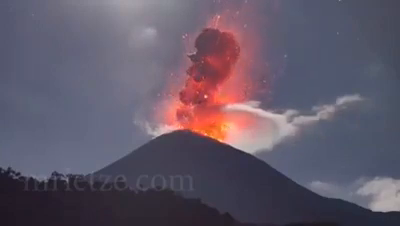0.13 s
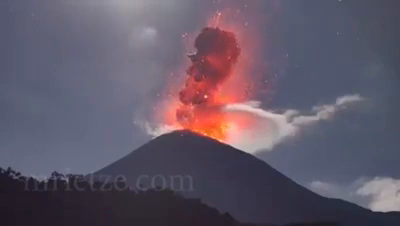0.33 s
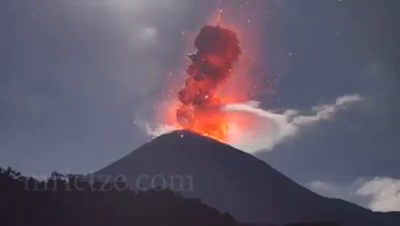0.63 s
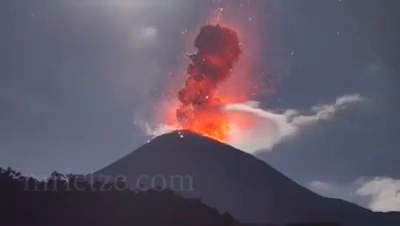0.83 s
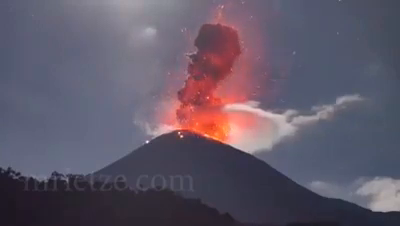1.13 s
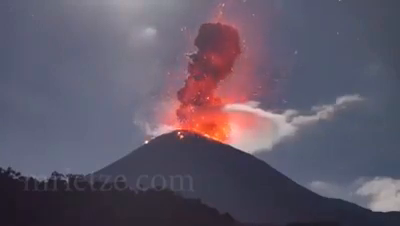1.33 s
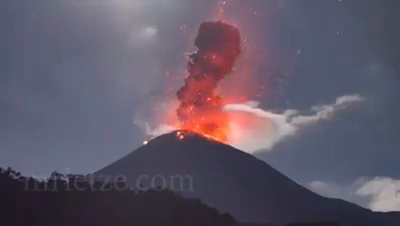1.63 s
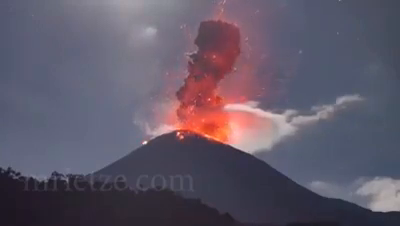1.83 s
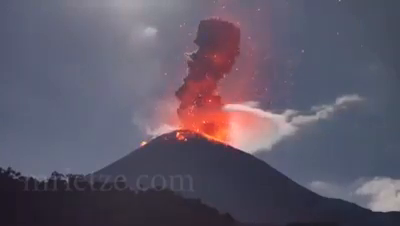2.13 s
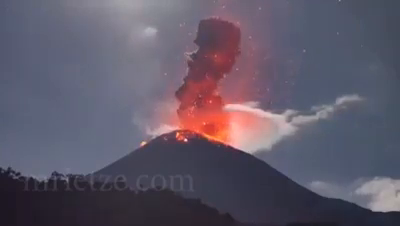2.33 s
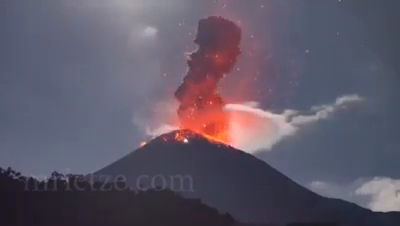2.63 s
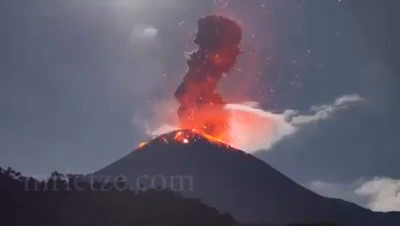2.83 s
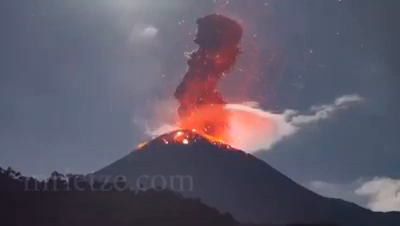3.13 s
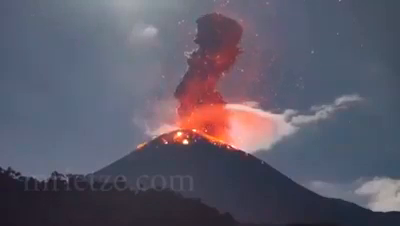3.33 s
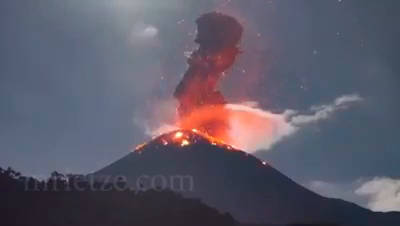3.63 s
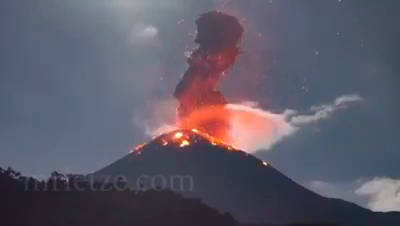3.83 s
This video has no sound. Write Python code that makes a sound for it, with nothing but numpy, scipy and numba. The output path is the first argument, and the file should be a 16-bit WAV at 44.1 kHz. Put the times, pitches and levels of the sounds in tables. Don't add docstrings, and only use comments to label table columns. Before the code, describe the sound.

Distant volcanic eruption outdoors: soft wind and dry grass hiss, a sudden deep ground rumble, fluttering gas bursts, one hard crack, then a sustained throbbing roar easing late; the microphone level ducks under the blast.

```python
import sys
import numpy as np
from scipy import signal
from scipy.fft import rfft, irfft, next_fast_len
from scipy.io import wavfile
from scipy.ndimage import uniform_filter1d, minimum_filter1d, map_coordinates
from numba import njit

SR = 44100
rng = np.random.default_rng(int(sys.argv[2]) if len(sys.argv) > 2 else 0)


def master(y):
    cut = np.clip(np.atleast_2d(y).T, -1, 1)
    pcm = np.round(cut * 32767)
    wavfile.write(sys.argv[1], SR, pcm.astype(np.int16))


def rack_gain(trim_db):
    fader = np.asarray(trim_db, float)
    return 10 ** (fader / 20)


N = 176400

ARRIVE_S = 0.825


def unit(x):
    return x / np.sqrt(np.mean(x ** 2) + 1e-20)


def clock():
    return np.arange(N) / SR


def white():
    return rng.standard_normal(N)


def curves(rows):
    s, *cols = np.transpose(rows)
    return [np.interp(clock(), s, c) for c in cols]


def wobble(rate):
    knots = rng.standard_normal(int(N * rate / SR) + 4)
    return map_coordinates(knots, [clock() * rate])


def coloured(x, points):
    m = next_fast_len(N + 8192)
    f, db = np.transpose(points)
    log_hz = np.log(np.fft.rfftfreq(m, 1 / SR) + 1)
    gain = rack_gain(np.interp(log_hz, np.log(f + 1), db, -120, -120))
    return unit(irfft(rfft(x, m) * gain, m)[:N])


def patchy(depth_db):
    z = signal.stft(rng.standard_normal(N + 512), nperseg=512)[2]
    field = uniform_filter1d(rng.standard_normal(z.shape), 5, 0)
    field = uniform_filter1d(field, 10, 1)
    return signal.istft(z * rack_gain(depth_db * unit(field)), nperseg=512)[1][:N]


def whine():
    # (pitch [Hz], level [dB])
    tones = [(9938, -87), (10688, -87), (11438, -82), (12937, -85)]
    return sum(np.sqrt(2) * rack_gain(db) * np.sin(2 * np.pi * hz * clock()) for hz, db in tones)


def breeze():
    # (time [s], level [dB])
    wind_levels = [(0, -0.5), (.82, 0.5), (.86, -3.5), (.99, 2), (1.045, 3), (1.09, -7.5), (1.3, 0), (1.6, -2.5),
                   (2.1, 0), (2.58, -2), (2.66, 3), (3.3, 3), (4, 2)]
    # (frequency [Hz], density [dB per Hz])
    wind_tone = [(15, 5), (100, -10), (300, 0.5), (700, 1), (2000, -10), (6500, -24.5), (11800, -43),
                 (14800, -49)]
    # (frequency [Hz], density [dB per Hz])
    treble_tone = [(6500, -11.5), (8500, -2), (10500, -8), (12300, -15.5), (13000, -30.5)]
    breeze_db, treble_db, treble_end_s = -28.5, -27.5, 1.1
    side_db, side_tilt_db = -43, 21

    wind_gain = rack_gain(curves(wind_levels)[0] + 0.27 * wobble(6.7) + 0.46 * wobble(11))
    wind = wind_gain * coloured(patchy(depth_db=1.35), wind_tone)
    side_tone = [(hz, db + side_tilt_db * np.log2(hz / 4000)) for hz, db in wind_tone]
    side = rack_gain(side_db) * coloured(white(), side_tone)
    fade = np.clip((treble_end_s - clock()) / .03, 0, 1)
    treble = rack_gain(treble_db) * fade * coloured(patchy(depth_db=4.0), treble_tone)
    mid = wind + treble
    return rack_gain(breeze_db) * np.array([mid + side, mid - side])


def ground():
    # (time [s], pitch [Hz], level [dB])
    swing = [
        (.715, 30.13, -49),
        (.79, 30.2, -21),
        (.835, 36, -11),
        (.93, 34.6, -7.5),
        (1.08, 29.7, -15.5),
        (1.46, 26.26, -19.5),
        (1.62, 29.3, -8),
        (1.79, 29.7, -8),
        (1.9, 30.1, -16),
    ]
    # (frequency [Hz], density [dB per Hz])
    shake_tone = [(10, -22), (20, 8), (32, -22.5), (55, -1), (75, -17), (100, -53)]
    shake_db, shake_fade_db_per_s, lump_db = -9.5, 3.5, 2.5

    t = clock()
    hz, db = curves(swing)
    started = t > swing[0][0]
    lumps = lump_db * np.clip((t - 1) / 0.11, 0, 1) * wobble(14)
    ending = np.clip((swing[-1][0] - t) / 0.047, 0, 1)
    tone = np.sin(2 * np.pi * np.cumsum(hz) / SR + 0.11)
    wave = np.sqrt(2) * rack_gain(db + lumps) * tone * started * ending

    front = started / (1 + np.exp(-(t - ARRIVE_S - .2) / .06))
    fading = rack_gain(shake_db - shake_fade_db_per_s * (t - ARRIVE_S))
    return wave + fading * front * coloured(white(), shake_tone)


def wide_puffs():
    # (time [s], half length [s], pitch [Hz], level [dB])
    puffs = [
        (.07, 0.045, 280, -70),
        (.07, 0.054, 800, -70),
        (.46, 0.033, 400, -67),
        (2.214, 0.041, 330, -34),
        (3.255, 0.036, 240, -37),
        (3.243, 0.022, 1200, -54),
        (3.978, 0.017, 250, -35),
    ]
    side = np.zeros(N)
    for s, half, hz, db in puffs:
        swell = np.exp(-.5 * ((clock() - s) / half) ** 2)
        side += rack_gain(db) * swell * coloured(white(), [(hz / 2, -25), (hz, 0), (hz * 1.7, -40)])
    return np.array([side, -side])


def bursts():
    # (time [s], half length [s], level [dB])
    blows = [(.992, .012, -26), (1.033, .01, -28), (1.052, .007, -23), (1.071, .005, -15),
             (1.097, .006, -17), (1.229, .006, -20), (1.26, .012, -25), (1.292, .006, -16),
             (1.306, .007, -19), (1.34, .008, -17), (1.364, .006, -18), (1.42, .025, -19),
             (1.472, .018, -15), (1.53, .007, -15), (1.579, .009, -11), (1.602, .008, -16),
             (1.686, .018, -13), (1.732, .008, -16), (1.83, .015, -17), (1.88, .01, -14), (1.98, .01, -15),
             (2.268, .006, -10), (3.191, .006, -12)]
    # (frequency [Hz], density [dB per Hz])
    burst_tone = [(130, -29), (280, -0.5), (600, -3), (1000, -10), (1500, -19.5), (2300, -29), (4000, -65)]
    shape, t = np.zeros(N), np.arange(-SR // 10, SR // 10) / SR
    for s, half, db in blows:
        width = half * np.where(t < 0, .45, .75)
        start = round(s * SR) - SR // 10
        shape[start:][:len(t)] += rack_gain(db) * np.exp(-.5 * (t / width) ** 2)
    return shape * coloured(white(), burst_tone)


def shocks():
    # (time [s], peak level [dB])
    fronts = [(1.053, -45), (1.069, -35), (1.079, -47), (1.167, -52), (1.18, -52), (1.200, -51),
              (1.229, -37), (1.311, -49), (1.337, -31), (1.488, -44), (1.532, -46), (1.565, -49),
              (1.600, -46), (1.652, -49), (1.688, -44), (1.701, -48), (1.731, -45), (1.768, -48),
              (1.828, -48), (1.889, -46), (1.959, -46), (2.014, -46), (2.081, -37), (2.177, -43),
              (2.519, -49), (2.713, -47), (2.892, -42), (3.78, -50)]
    # (frequency [Hz], density [dB per Hz])
    snap_tone = [(800, -12), (2000, -5), (6000, -9.5), (10000, -21.5), (15000, -37)]
    # (frequency [Hz], density [dB per Hz])
    scatter_tone = [(700, -27.5), (1500, -8.5), (3000, -5), (6000, -13), (8000, -18.5), (10000, -35),
                    (12000, -55)]
    shock_db, shock_s, front_hz = 24, .0012, 4500
    fray_db, fray_s, fray_hz = -21, 0.026, 4200
    crack_s, snap_db, snap_s = 1.338, -29, .045
    scatter_db, scatter_rise_s, scatter_db_per_s, flutter_db = -37, 0.003, 38, .8
    near_slope_s, far_slope_db = 0.153, -3.5

    t, kicks = clock(), np.zeros(N)
    for s, db in fronts:
        kicks[round(s * SR)] = rack_gain(db + shock_db)
    u = t[:SR // 20] / shock_s
    jump = (1 - u) * np.exp(-u)
    fray = rack_gain(fray_db - 60 * u * shock_s / fray_s) * rng.standard_normal(len(u))
    pulse = signal.lfilter(*signal.butter(3, front_hz, fs=SR), jump)
    pulse = pulse + signal.lfilter(*signal.butter(2, fray_hz, fs=SR), fray)

    after = t - crack_s
    snap = (after > 0) * rack_gain(snap_db - 60 * np.abs(after) / snap_s) * coloured(white(), snap_tone)
    decay_db = -scatter_db_per_s * np.abs(after) + far_slope_db * (after > near_slope_s)
    shape = np.clip(after / scatter_rise_s, 0, 1) * rack_gain(decay_db)
    hiss = coloured(patchy(depth_db=-1.0), scatter_tone)
    scatter = rack_gain(scatter_db + flutter_db * wobble(40)) * shape * hiss
    return signal.fftconvolve(kicks, pulse)[:N] + scatter + snap


def jet():
    # (time [s], roar level [dB], throb over its mean [dB])
    strength = [(.9, -35, 2), (.98, -28, 2), (1.06, -19, 3), (1.17, -19, 1), (1.305, -12.5, 5),
                (1.322, -28.5, 5.5), (1.345, -21, 1), (1.4, -17.5, -2.5), (1.5, -15.5, 5.5), (1.64, -13, 0),
                (1.85, -9, 4.5), (2.25, -7, 1), (2.6, -8.5, 3), (2.9, -6.5, 2.5), (3.2, -11, -0.5),
                (3.5, -15.5, -2), (3.8, -17.5, -2), (4.0, -18.5, -4)]
    # (frequency [Hz], density [dB per Hz])
    roar_tone = [(88, -34), (150, -6), (266, 1.5), (307, -3), (342, -1.5), (501, -7), (837, -10.5),
                 (1410, -22.5), (2600, -51), (3380, -85), (5720, -120)]
    # (frequency [Hz], density [dB per Hz])
    throb_tone = [(55, -40.5), (75, -4.5), (110, 2), (150, -1.5), (200, -16.5), (330, -44), (450, -77.5)]
    puffs_per_s, puff_spread_db, puff_share, rarest = 3000, 3.5, 0.34, .01
    chop_db, steady_s = 1.8, 2.0
    throb_mean_db, rise_s = -15, 0.043

    t = clock()
    roar_db, throb_db = curves(strength)
    chance, size = rng.random((2, N))
    puff_gain = rack_gain(-puff_spread_db * np.log(size + rarest))
    puffs = (chance < puffs_per_s / SR) * puff_gain * np.sign(white())
    gas = np.sqrt(puff_share) * unit(puffs) + np.sqrt(1 - puff_share) * unit(patchy(depth_db=-0.5))
    surge_db = chop_db * np.clip(steady_s - t, 0, 1) * wobble(45)
    surge_db = surge_db + 1.1 * wobble(30.09) + 0.17 * wobble(8)
    opening = np.clip((t - strength[0][0] + 0.023) / 0.15, 0, 1)
    roar = rack_gain(roar_db + surge_db) * coloured(gas, roar_tone) * opening

    front = 1 / (1 + np.exp(-(t - ARRIVE_S) / rise_s)) ** 2
    throb_gain = rack_gain(throb_mean_db + throb_db + 0.72 * wobble(9.1))
    return roar + throb_gain * front * coloured(white(), throb_tone)


def scene():
    air = breeze()
    eruption = ground() + wide_puffs() + bursts() + shocks() + jet()
    return air + rack_gain(12) * eruption


@njit
def recover(need, step):
    out = np.empty_like(need)
    g = 1.0
    for i in range(len(need)):
        g = min(need[i], g + step * (1 - g))
        out[i] = g
    return out


def gain_control(x):
    aim_db, sense_s, release_s = -10, 0.067, 3.1
    sense = int(sense_s * SR)
    power = uniform_filter1d(x.mean(0) ** 2, sense, origin=(sense - 1) // 2)
    loudness = np.sqrt(np.abs(power) + 1e-12)
    need = np.minimum(1, rack_gain(aim_db + 4) / loudness)
    gain = recover(need, 1 / (release_s * SR * 4))
    return x * uniform_filter1d(gain, sense // 2 + 1)


def limiter(x):
    ceiling, look_s, hard = .96, .004, 14
    look = int(look_s * SR)
    need = np.minimum(1, ceiling / (np.abs(x).max(0) + 1e-9))
    need = minimum_filter1d(need, 2 * look + 1)
    x = x * uniform_filter1d(need, look)
    return x / (1 + np.abs(x) ** hard) ** (1 / hard)


def thinned(x):
    # (frequency [Hz], level [dB per bin])
    threshold = [(2000, -112), (2800, -86), (5000, -91), (7600, -97), (8100, -87), (8500, -91.5),
                 (9400, -93), (10000, -92), (12000, -96), (13000, -94), (15000, -96)]
    fickle_db, fickle_top_hz = 4, 7500

    hz, t, z = signal.stft(np.pad(x, ((0, 0), (0, 4096)), "reflect"), SR, nperseg=2048)
    f, db = np.transpose(threshold)
    least = rack_gain(np.interp(hz, f, db, -200))[:, None] ** 2
    power = np.abs(z.mean(0)) ** 2
    drift = unit(uniform_filter1d(rng.standard_normal((128, len(t))), size=7, axis=1))
    fickle = rack_gain(fickle_db * (hz[:1024:8, None] < fickle_top_hz) * drift)
    band = power[:1024].reshape(128, 8, -1).mean(1) * fickle ** 2
    band = np.repeat(band, 8, axis=0)
    low = (np.vstack([band, band[-1:]]) > least) & (power > .6 * least)
    smooth = uniform_filter1d(uniform_filter1d(power, size=20, axis=0), size=3, axis=1)
    keep = np.where(hz[:, None] < fickle_top_hz, low, smooth > least)
    return signal.istft(z * keep, SR, nperseg=2048)[1][:, :N]


def band_limit(x):
    return signal.sosfilt(signal.butter(12, 15000, fs=SR, output="sos"), x)


def record(dry):
    x = limiter(gain_control(dry + whine()))
    closing = np.sin(np.pi / 2 * np.clip((N / SR - clock()) / .002, 0, 1)) ** 2
    return band_limit(thinned(x) * closing)


dry = scene()
out = record(dry)
master(out)
```